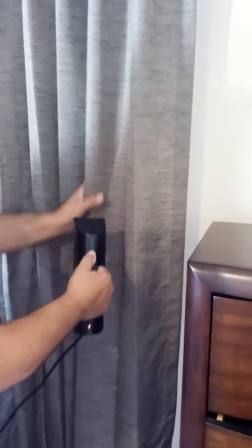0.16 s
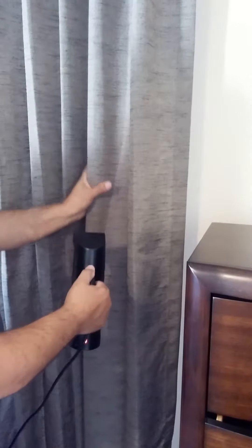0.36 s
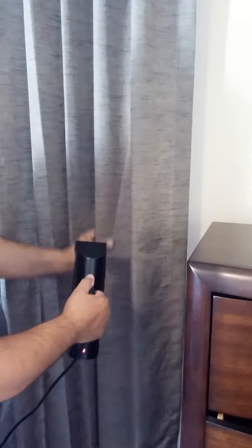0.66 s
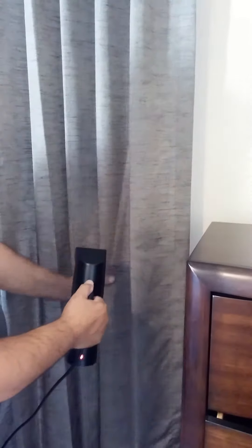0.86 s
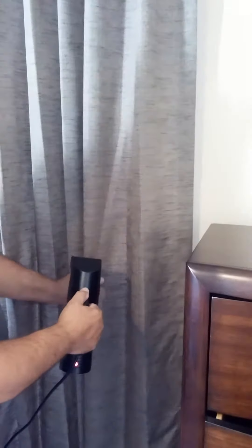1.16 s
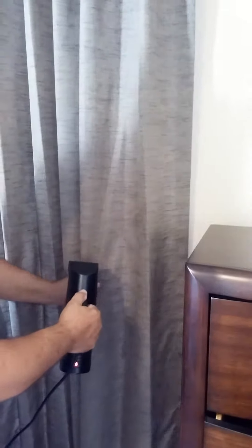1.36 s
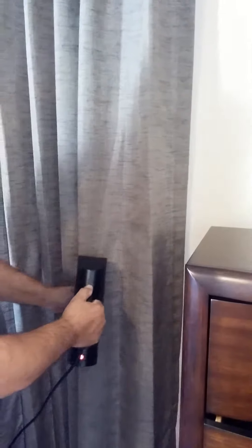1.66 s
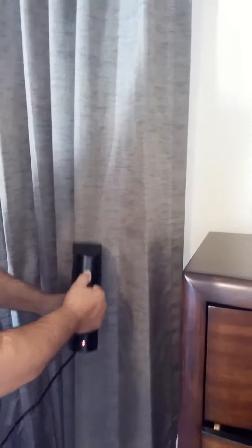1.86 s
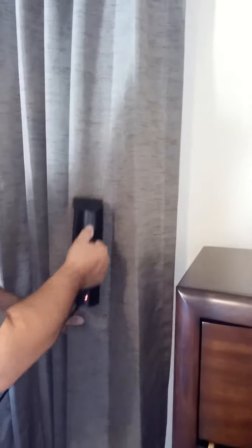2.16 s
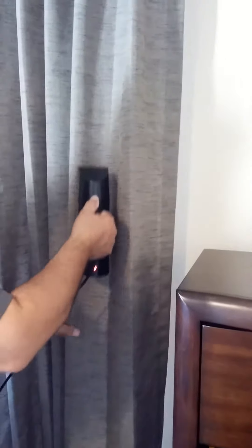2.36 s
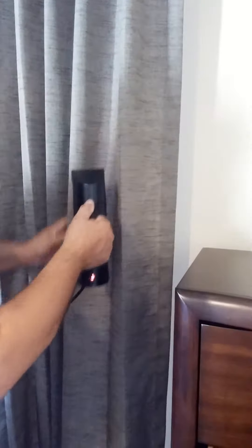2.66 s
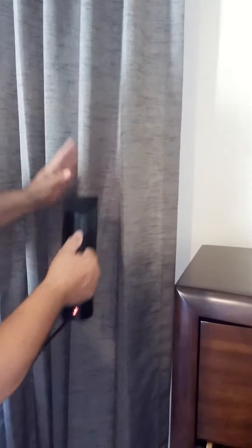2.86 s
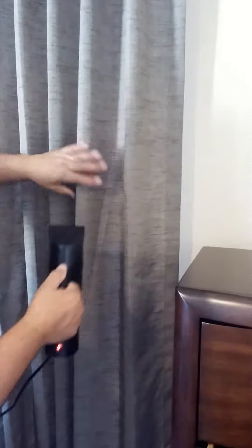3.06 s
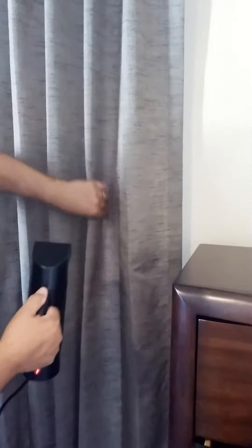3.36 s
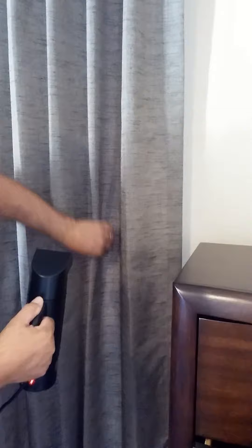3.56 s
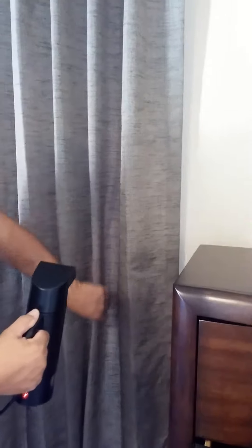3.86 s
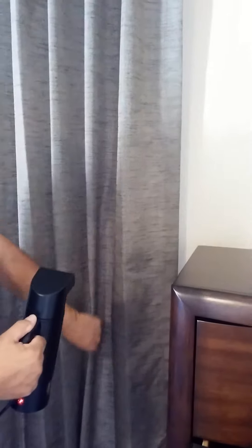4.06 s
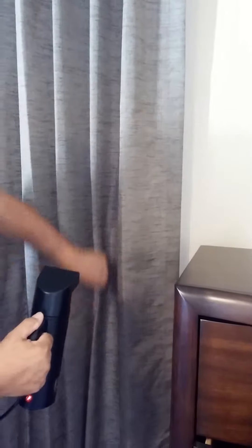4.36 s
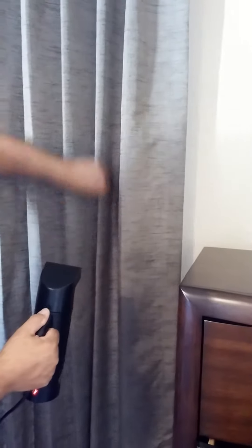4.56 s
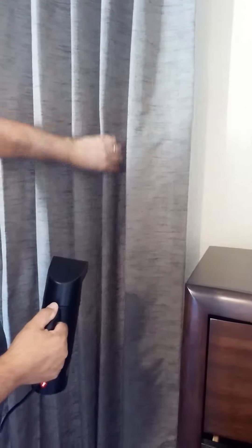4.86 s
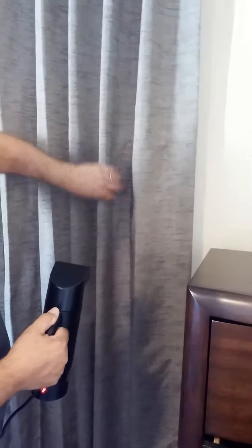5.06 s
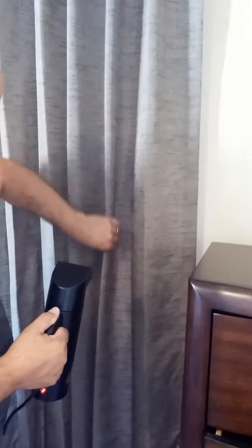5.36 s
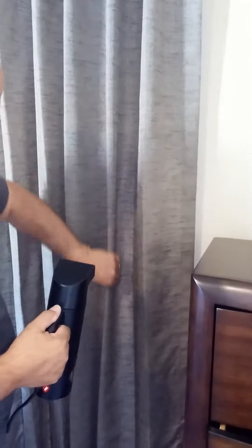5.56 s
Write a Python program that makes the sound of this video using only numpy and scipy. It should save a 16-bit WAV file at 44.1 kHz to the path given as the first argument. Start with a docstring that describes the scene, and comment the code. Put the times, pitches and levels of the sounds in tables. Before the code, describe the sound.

Steam spits and hisses from a garment steamer as its little boiler gulps and rumbles, the hiss growing stronger and steadier.

```python
"""Garment steamer against a curtain.

A handheld steamer hisses in uneven surges in a quiet room. Water slugs choke the nozzle and burst
free; droplets and bubbles ring the steam channels. The small boiler rumbles and gulps as steam
pockets collapse. Near the end a faint chord sounds, perhaps a far car horn.
Heard by two phone microphones, each behind a resonant port."""
import sys
import numpy as np
from scipy import signal
from scipy.fft import rfft, irfft
from scipy.io import wavfile
from scipy.ndimage import uniform_filter1d

SR = 44100
rng = np.random.default_rng(int(sys.argv[2]) if len(sys.argv) > 2 else 0)


def store_wav(level_fs):
    """Save 16-bit WAV to argv[1]."""
    pcm = np.round(np.clip(np.atleast_2d(level_fs), -1, 1) * 32767)
    wavfile.write(sys.argv[1], SR, pcm.T.astype(np.int16))


N = 251370

# noise floor (frequency [Hz], relative density [dB])
FLOOR_SPECTRUM = [(100, -28), (600, -9.5), (1500, -50), (4000, -30), (9000, -25), (15000, -20)]
# horn chord (frequency [Hz], level [dB])
HORN_NOTES = [(227, -67.5), (357, -67), (452, -59.5), (512, -68.5)]
# horn swell (time [s], gain [dB])
HORN_ENVELOPE = [(5.29, -21), (5.31, -3), (5.6, 0.5), (5.66, -14)]
# boiling between gulps (time [s], level [dB], bass lift [dB])
BOIL_ENVELOPE = [(0.0, -62, 5), (0.17, -68.5, -9), (1.62, -61, -6), (1.78, -83, -6), (2.0, -64.5, -4),
                 (2.3, -63, 2.5), (2.59, -65, 2), (2.73, -65, -1.5), (2.95, -67, -5), (3.33, -72, -1.5),
                 (3.7, -74, 1), (3.89, -68, 7), (4.05, -56, -3), (4.21, -64.5, 2), (5.21, -71, 0),
                 (5.38, -71, 2.5), (5.48, -63, -2), (5.7, -63, -4)]
# air in the tank (frequency [Hz], relative density [dB])
TANK_SPECTRUM = [(30, -53), (50, -5), (70, -1), (95, -16), (120, 4.5), (140, -7.5), (176, 2), (212, -10),
                 (242, -7.5), (290, -13), (400, -18), (550, -28.5)]
# brief dips in the rumble (centre [s], loss [dB], half length [s])
RUMBLE_LULLS = [(.28, 8, 0.032), (0.805, 10, 0.03), (1.45, 6.5, 0.052), (1.86, 14, 0.041),
                (2.874, 6, 0.032), (3.276, 7, 0.027), (3.63, 11, 0.041), (3.78, 14, .045),
                (4.283, 12, 0.027), (4.566, 6, 0.037), (4.783, 12, 0.025), (5.013, 18, 0.054),
                (5.25, 13, 0.04)]
# collapsing steam pockets (time [s], level [dB], pitch [Hz], length [s])
BOILER_GULPS = [(0.076, -46.5, 175, 0.025), (0.109, -55, 149, 0.064), (0.519, -54.5, 184, 0.032),
                (0.635, -50, 184, 0.021), (0.664, -44, 159, 0.025), (0.686, -43.5, 180, 0.024),
                (0.865, -49.5, 178, 0.016), (0.939, -53, 180, 0.013), (1.131, -65, 171, 0.024),
                (1.184, -55, 145, 0.027), (1.301, -51, 175, 0.03), (1.325, -48, 168, 0.019),
                (1.357, -60.5, 185, 0.034), (1.487, -57, 183, 0.026), (1.576, -59, 187, 0.031),
                (1.718, -53, 208, 0.037), (1.759, -59.5, 183, 0.056), (1.974, -61, 184, 0.02),
                (2.1, -58.5, 160, 0.052), (2.143, -51.5, 203.5, 0.058), (2.209, -52, 176, 0.024),
                (2.269, -59, 188, 0.025), (2.322, -52.5, 194, 0.027), (2.356, -59, 114, 0.023),
                (2.423, -50.5, 196, 0.019), (2.494, -53, 137, 0.027), (2.529, -56.5, 179, 0.027),
                (2.6, -55.5, 180, 0.029), (2.652, -51, 192, 0.033), (2.696, -46.5, 185, 0.03),
                (3.06, -47.5, 168, 0.034), (3.175, -45, 174, 0.032), (3.309, -50.5, 172, 0.02),
                (3.374, -52.5, 190, 0.015), (3.471, -52, 176, 0.034), (3.519, -55, 181, 0.031),
                (3.959, -46.5, 161, 0.028), (3.989, -49, 146, 0.042), (4.077, -58, 110, 0.089),
                (4.162, -58.5, 120, 0.067), (4.336, -54, 150, 0.022), (4.459, -57.5, 155, 0.037),
                (4.658, -50.5, 149, 0.021), (4.829, -53, 176, 0.03), (4.884, -53.5, 184, 0.027),
                (5.063, -46.5, 183.6, 0.032), (5.138, -55.5, 171, 0.023), (5.382, -52.5, 172, 0.036),
                (5.515, -52.5, 181, 0.052), (5.551, -47, 181, 0.033)]
# splash resonances (frequency [Hz], width [Hz], gain [dB])
SPLASH_MODES = [(710, 64, 9), (1250, 170, -7), (1710, 200, -16)]
# bubbles bursting in the channels (time [s], level [dB], pitch [Hz])
BUBBLE_POPS = [(0.173, -43, 825), (0.291, -43, 1880), (0.471, -37.5, 1230), (0.531, -40, 1020),
               (0.684, -39, 675), (0.858, -49, 923), (1.472, -45, 1200), (2.149, -49, 694),
               (2.314, -50, 1910), (2.348, -45, 1010), (2.424, -39.5, 1210), (2.659, -47, 1210),
               (2.797, -46, 1360), (2.899, -41, 1190), (3.062, -37.5, 700), (3.181, -42, 696),
               (3.362, -36.5, 1200), (3.45, -52, 880), (3.514, -47, 845), (3.833, -34.5, 1250),
               (4.001, -38.5, 960), (4.27, -40.5, 980), (4.461, -42.5, 1250), (4.647, -38.5, 1280),
               (4.979, -36.5, 970), (5.334, -38.5, 710), (5.382, -38, 740), (5.464, -31, 890),
               (5.519, -34.5, 800), (5.64, -41, 851), (5.684, -32, 1820)]
# steam channel resonances (frequency [Hz], width [Hz], left [dB], right [dB])
CHANNEL_MODES = [(702, 48, -3.5, -29), (811, 81, -3, -14), (928, 29, -0.5, -9), (1056, 22, -12.5, -6),
                 (1213, 29, -6, -7), (1802, 63, -2.5, -12.5)]
# water slugs in the nozzle (release [s], loss [dB], choke [s], reopening [s], spurt [dB])
WATER_SLUGS = [(.09, 11, 0.057, 0.021, 0), (.138, 1, .01, .002, 1.5), (0.284, 4, 0.035, 0.0027, 4.5),
               (0.375, 0, .02, 0.0016, 7.5), (0.445, 15.5, 0.077, 0.0018, -2.5),
               (0.6367, 6.5, 0.069, .001, 5.5), (0.7898, 8, 0.071, 0.0012, 5.5),
               (.9493, 0.5, 0.094, 0.0015, 5.5), (1.099, 17.5, 0.041, 0.022, 14),
               (1.212, 16, 0.032, 0.011, -3), (1.2455, -2.5, 0.016, 0.0018, 11),
               (1.43, 13, 0.059, 0.032, 8), (1.476, 13.5, 0.094, 0.0019, -6),
               (1.762, 19, 0.049, 0.0091, -1), (1.79, 5, 0.013, .001, 5.5), (1.866, 17, 0.044, 0.0088, 0),
               (2.017, 4.5, 0.024, 0.0027, 4.5), (2.128, 12, 0.033, 0.0016, 0),
               (2.216, 20, 0.02, 0.00089, 8), (2.309, 2, 0.044, 0.0019, 8.5),
               (2.395, 4.5, 0.027, 0.0045, 2), (2.66, 21, .11, .001, 3.5), (2.7765, 1, 0.016, .003, 6.5),
               (3.0614, 0, .03, 0.0025, 14), (3.161, 7, 0.026, .002, 7.5), (3.221, 3, 0.014, .001, 6.5),
               (3.42, 3, 0.018, .02, 4.5), (4.13, 2.5, 0.096, 0.015, 4.5), (4.27, 4.5, 0.024, 0.0018, -0.5),
               (4.28, 12.5, 0.052, 0.035, -8), (4.33, 2, 0.037, .004, 2.5), (4.839, 11.5, 0.035, 0.018, -3),
               (5.175, 6.5, 0.071, 0.017, -1), (5.33, 6, 0.038, 0.036, -2)]
# steam pressure, heard as the open jet (time [s], level [dB], body lift [dB], ringing gain [dB])
JET_ENVELOPE = [(0, -53, -1, -14), (.14, -47, -1.5, -19.5), (.5, -47.5, 1, -13), (.96, -50.5, -1.5, -10),
                (1.15, -61, 5.5, -11), (1.3, -60, 2.5, -16.5), (1.65, -53, -1, -12.5), (1.92, -62, 9, -2),
                (2.2, -65, 5, -1.5), (2.36, -60.5, 7, -18), (2.43, -47.5, 3, -15), (2.5, -61, -1, -9),
                (2.72, -66, 2.5, -15), (2.8, -56, 3, -16), (2.93, -49, 0, -14.5), (3.04, -61.5, 9, -5),
                (3.2, -61, 3, -7.5), (3.33, -44, -2, -17), (3.6, -43.5, 2, -9), (3.92, -41.5, -2, -14.5),
                (4.17, -47.5, 0, -10.5), (4.4, -41.5, -1.5, -14), (4.7, -38.5, -4, -20),
                (4.9, -40, -3.5, -13), (5.05, -46, 1, -7), (5.26, -40.5, -3, -14), (5.4, -42, -2, -10.5),
                (5.7, -41.5, -0.5, -11.5)]
# jet hiss (frequency [Hz], relative density [dB])
JET_SPECTRUM = [(300, -16.5), (500, -15), (800, -10), (1500, -7.5), (2500, -9), (4000, -10), (6500, -9.5),
                (11000, -9.5), (16000, -14.5)]
# jet colour at the right microphone (frequency [Hz], gain [dB])
JET_RIGHT_EQ = [(300, 0), (700, -2.5), (1200, -3), (2500, -1.5), (6000, -1), (10000, -9), (15000, -12)]
# left-right likeness of the jet (frequency [Hz], correlation [-])
JET_COHERENCE = [(300, 0.96), (700, 0.43), (1200, 0), (2000, 0.22), (5000, 0), (12000, 0.042)]
# microphone ports, left then right (frequency [Hz], width [Hz], lift [dB])
MIC_PORTS = [(9510, 1960, 14), (8520, 1940, 10.5)]


def gain(db):
    """Decibels to amplitude."""
    return 10 ** (np.asarray(db) / 20)


def unit_rms(x):
    """Scale to rms 1."""
    return x / np.sqrt(np.mean(x ** 2) + 1e-20)


def log_interp(points, hz):
    """Interpolate on a log-frequency axis."""
    f, value = np.transpose(points)
    return np.interp(np.log(hz + 1), np.log(f + 1), value)


def add(mix, start_s, sound):
    """Mix a sound in at start_s."""
    part = mix[round(start_s * SR):][:len(sound)]
    part += sound[:len(part)]


def resonate(x, hz, width_hz):
    """Single resonance, peak gain about 1."""
    r = np.exp(-np.pi * width_hz / SR)
    return 2 * signal.lfilter([1 - r], [1, -r * np.exp(2j * np.pi * hz / SR)], x).real


def drift(samples):
    """Smooth random drift, rms 1."""
    return unit_rms(uniform_filter1d(uniform_filter1d(rng.standard_normal(N), samples), samples))


def stereo_noise(colour_db, coherence, patchy_db, fft_size):
    """Partly correlated noise pair with drifting spectral patches, rms 1."""
    frames, hz = 4 * N // fft_size + 5, np.fft.rfftfreq(fft_size, 1 / SR)
    a, b, c, d, patches = rng.standard_normal((frames, len(hz), 5)).T
    patches = unit_rms(uniform_filter1d(uniform_filter1d(patches, 6, axis=0), 12, axis=1))
    shared = np.clip(coherence(hz), -1, 1)[:, None]
    left = a + 1j * b
    spectra = np.array([left, shared * left + np.sqrt(1 - shared ** 2) * (c + 1j * d)])
    spectra *= gain(colour_db(hz, np.arange(frames) * fft_size / 4 / SR) + patchy_db * patches)
    return unit_rms(signal.istft(spectra, nperseg=fft_size, noverlap=3 * fft_size // 4)[1][:, :N])


def noise_floor(level_db=-74):
    """Hush of room and microphones."""
    air = stereo_noise(lambda hz, frame_s: log_interp(FLOOR_SPECTRUM, hz)[:, None],
                       lambda hz: np.full_like(hz, 0.2), patchy_db=2.5, fft_size=1024)
    return air * gain(level_db + np.array([[2], [-3]]))


def far_horn(waver_cycles=0.094):
    """Distant chord; its phases waver on the way through the air."""
    times_s, swell_db = np.transpose(HORN_ENVELOPE)
    t = np.arange(N) / SR
    wavers = unit_rms(uniform_filter1d(rng.standard_normal((len(HORN_NOTES), N)), 1500, axis=1))
    chord = sum(gain(db) * np.sqrt(2) * np.sin(2 * np.pi * (hz * t + waver_cycles * waver))
                for (hz, db), waver in zip(HORN_NOTES, wavers))
    return chord * gain(np.interp(t, times_s, swell_db, -90, -90) + [[2], [-3.5]])


def boiler_rumble(heave_re_gulp_db=-14.5, heave_s=0.049, heave_bass_share=0.66):
    """Boiling rings the air in the tank; each gulp heaves it, most in the bass."""
    times_s, boil_db, bass_db = np.transpose(BOIL_ENVELOPE)
    t = np.arange(0, N, 64) / SR
    calm_db = np.interp(t, times_s, boil_db)
    heave_power = sum(gain(db + heave_re_gulp_db) ** 2 * np.exp(-((t - at_s) / heave_s) ** 2)
                      for at_s, db, _, _ in BOILER_GULPS)
    heave_db = 10 * np.log10(1 + heave_power / gain(calm_db) ** 2)
    lull_db = sum(db / (1 + ((t - at_s) / half_s) ** 4) for at_s, db, half_s in RUMBLE_LULLS)

    def colour_db(hz, frame_s):
        bass = 1 / (1 + (hz / 140) ** 6)
        sides_db = np.array([np.full_like(hz, 4.4), -3 - 3 * bass])
        steady_db = log_interp(TANK_SPECTRUM, hz) - hz / 150 + sides_db
        lift_db = np.interp(frame_s, times_s, bass_db)
        lift_db += heave_bass_share * np.interp(frame_s, t, heave_db)
        return steady_db[:, :, None] + bass[:, None] * lift_db

    tank = stereo_noise(colour_db, lambda hz: np.full_like(hz, 0.78), patchy_db=0.5, fft_size=2048)
    level_db = np.interp(np.arange(N) / SR, t, calm_db + heave_db - lull_db)
    return tank * gain(level_db + 3.8 * drift(samples=1300))


def boiler_gulps(attack_s=0.00083, splash_db=-36):
    """Each collapsing steam pocket rings the tank and throws a splash through the channels."""
    out, t = np.zeros(N), np.arange(round(0.2 * SR)) / SR
    for at_s, db, hz, length_s in BOILER_GULPS:
        envelope = (1 - np.exp(-t / attack_s)) / (1 + (t / length_s) ** 6)
        fuzz, spray = rng.standard_normal((2, len(t)))
        ring = np.sin(2 * np.pi * hz * t) + 0.41 * unit_rms(resonate(fuzz, hz, width_hz=73))
        splash = unit_rms(sum(gain(g) * resonate(spray, f, width) for f, width, g in SPLASH_MODES))
        add(out, at_s, gain(db) * envelope * (ring + gain(splash_db) * splash))
    return out * gain([[2.5], [-4]])


def bubble_pops(attack_s=0.011, t60_s=0.057, width_hz=330):
    """Bubbles burst in the channels, each a short rough ring."""
    out, t = np.zeros(N), np.arange(round(0.12 * SR)) / SR
    for at_s, db, hz in BUBBLE_POPS:
        burst = rng.standard_normal(len(t))
        ring = unit_rms(resonate(resonate(burst, hz, width_hz), hz, width_hz))
        envelope = gain(db - 60 * t / t60_s) * (1 - np.exp(-t / attack_s))
        add(out, at_s, envelope * ring)
    return out * gain([[2], [-4]])


def channel_ringing(drops_per_s=900):
    """Droplets strike the channel walls at random, a few hard, and ring their modes."""
    hits = rng.random(N) < drops_per_s / SR
    drops = hits * gain(2.4 * np.minimum(rng.exponential(1, N), 4))
    near, far = drops * rng.standard_normal((2, N))
    drive = np.array([near, 0.12 * near + 1.4 * far])  # second path to the right microphone
    return unit_rms(sum(gain([[left_db], [right_db]]) * resonate(drive, hz, width_hz) / np.sqrt(width_hz)
                        for hz, width_hz, left_db, right_db in CHANNEL_MODES))


def water_slugs(t, choke_steepness=4.62, spurt_decay_s=0.036):
    """Slugs choke the nozzle, then leave with a spurt; returns loss and spurt in dB."""
    loss_db, spurt_db = np.zeros((2, N))
    for release_s, depth_db, choke_s, reopen_s, jump_db in WATER_SLUGS:
        before_s, after_s = np.maximum(release_s - t, 0), np.maximum(t - release_s, 0)
        shut = np.exp(-after_s / reopen_s)
        loss_db += depth_db * shut / (1 + (before_s / choke_s) ** choke_steepness)
        spurt_db += jump_db * (1 - shut) * np.exp(-after_s / spurt_decay_s)
    return loss_db, spurt_db


def steam_jet(wander_db=1.5, body_edge_hz=3000):
    """Turbulent jet through narrow channels; pressure sets the level, slugs cut steps in it."""
    times_s, open_db, body_db, ring_db = np.transpose(JET_ENVELOPE)
    t = np.arange(N) / SR
    loss_db, spurt_db = water_slugs(t)
    # body and ringing escape a small share of each choke
    body_db = np.interp(t, times_s, body_db) + 0.095 * loss_db + wander_db * drift(samples=2500)
    ring_db = np.interp(t, times_s, ring_db) + 0.067 * loss_db + wander_db * drift(samples=2500)
    level_db = np.interp(t, times_s, open_db) - loss_db + spurt_db + 0.7 * drift(samples=300)

    def colour_db(hz, frame_s):
        sides_db = np.array([np.zeros_like(hz), log_interp(JET_RIGHT_EQ, hz)])
        steady_db = log_interp(JET_SPECTRUM, hz) + sides_db
        body = 1 / (1 + (hz / body_edge_hz) ** 4)
        return steady_db[:, :, None] + body[:, None] * np.interp(frame_s, t, body_db)

    hiss = stereo_noise(colour_db, lambda hz: log_interp(JET_COHERENCE, hz), patchy_db=1.5, fft_size=512)
    jet = gain(-2.5) * hiss + gain(ring_db) * channel_ringing()
    return jet * gain(level_db + [[1.5], [-1.5]])  # steamer slightly left


def scene():
    """Stereo sum of all sources."""
    return steam_jet() + bubble_pops() + boiler_rumble() + boiler_gulps() + far_horn() + noise_floor()


def record(dry):
    """Each microphone port lifts a treble band; a low-pass follows."""
    hz = np.fft.rfftfreq(N, 1 / SR)
    lift_db = np.array([db / (1 + (2 * (hz - f) / width_hz) ** 2) for f, width_hz, db in MIC_PORTS])
    heard = irfft(rfft(dry) * gain(lift_db), N)
    lowpass = signal.firwin(511, cutoff=15800, window=("kaiser", 9), fs=SR)
    return signal.oaconvolve(heard, lowpass[None], "same")


dry = scene()
out = record(dry)
store_wav(out)
```